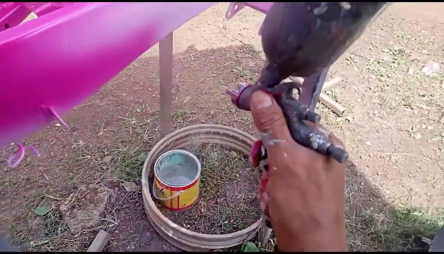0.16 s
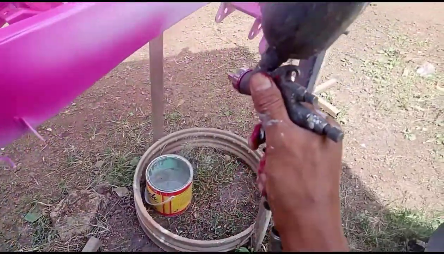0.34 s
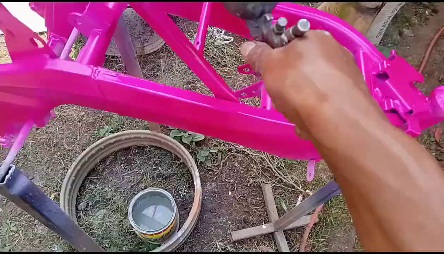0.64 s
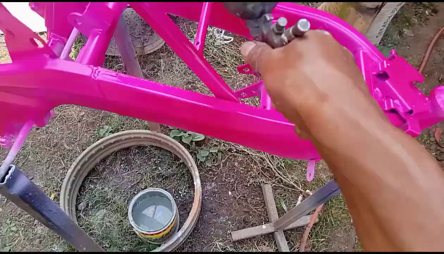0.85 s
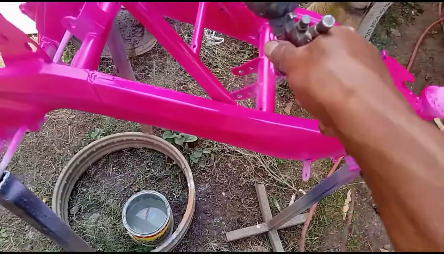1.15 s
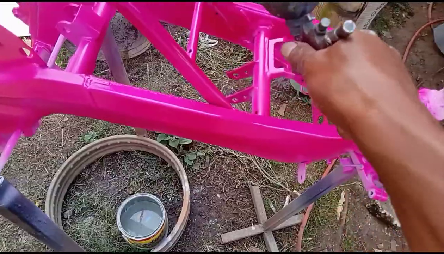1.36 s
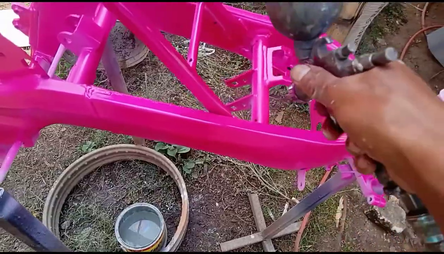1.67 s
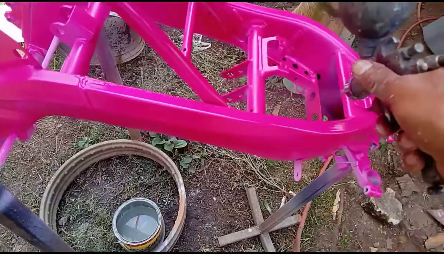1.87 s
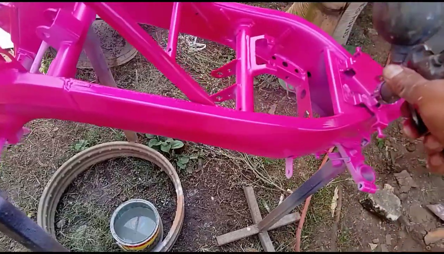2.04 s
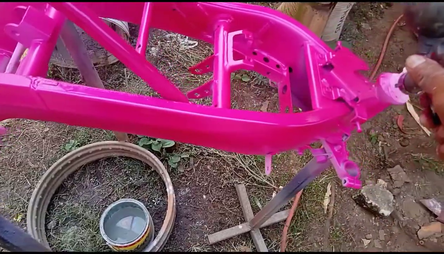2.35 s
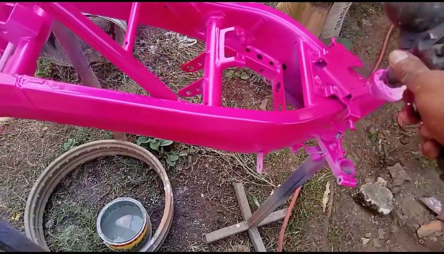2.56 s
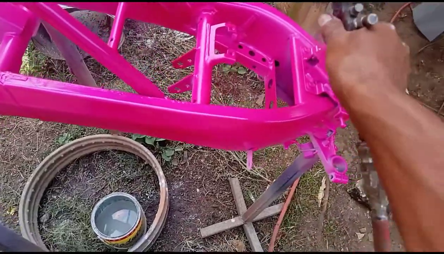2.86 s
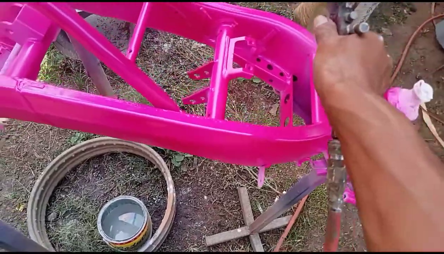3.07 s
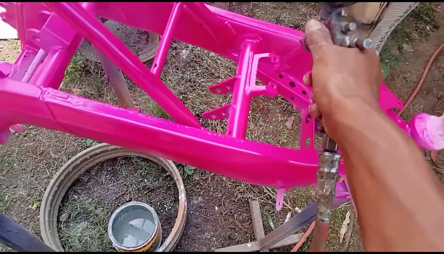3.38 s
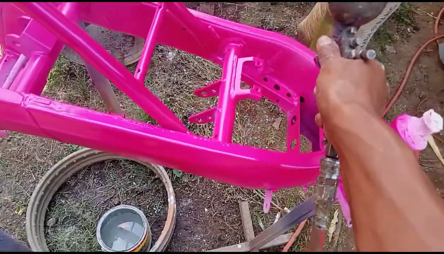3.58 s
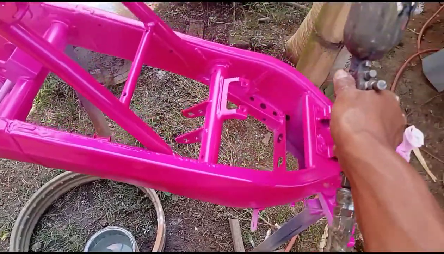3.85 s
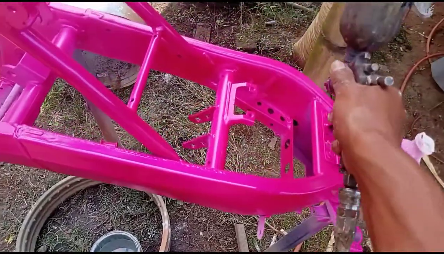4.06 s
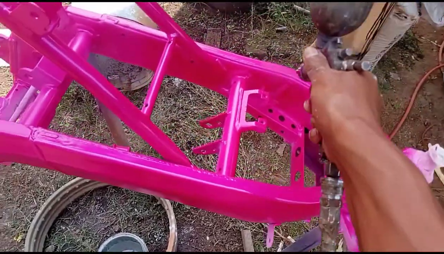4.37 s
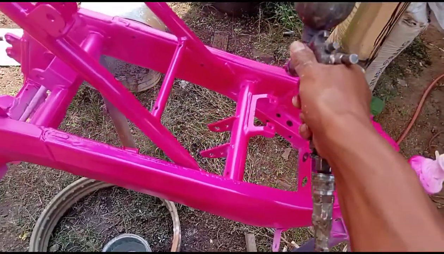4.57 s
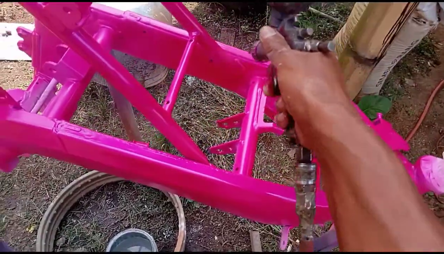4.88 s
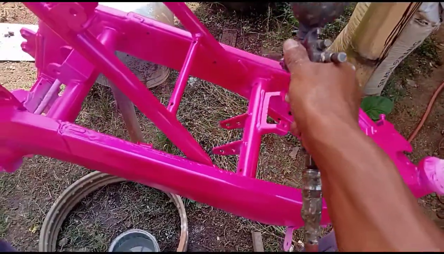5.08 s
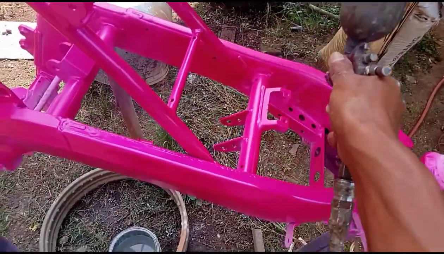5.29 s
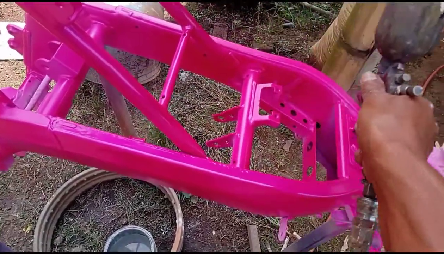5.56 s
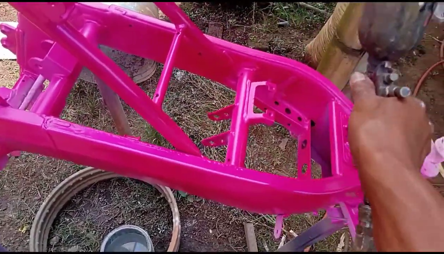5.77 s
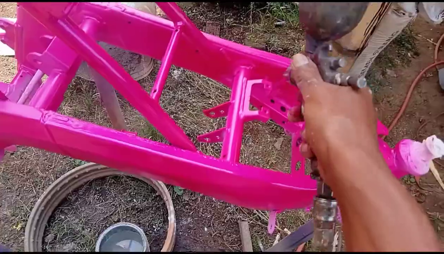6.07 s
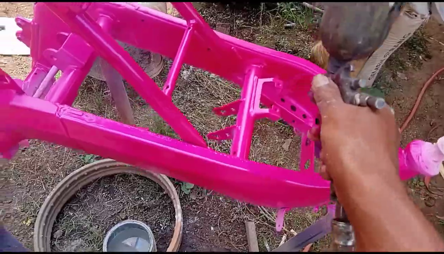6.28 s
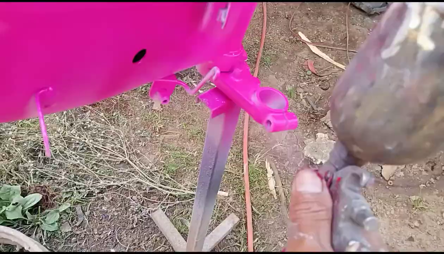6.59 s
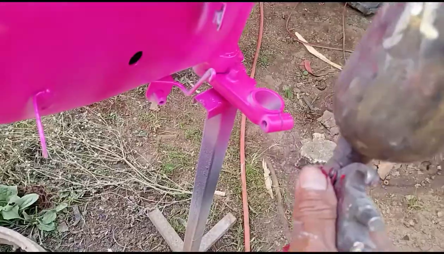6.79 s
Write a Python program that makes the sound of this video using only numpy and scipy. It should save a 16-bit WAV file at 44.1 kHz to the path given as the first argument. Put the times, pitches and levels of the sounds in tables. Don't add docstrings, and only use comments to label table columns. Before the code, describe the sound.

A steady, dry, airy roar of paint spraying onto steel tubes fills the foreground, with fizzing, sizzling swells as the fan strikes metal. Underneath are a fast muffled compressor chug, faint hollow hose blips, low ground rumble and a passing one-cylinder engine. The sound stops sharply twice, early and late, each time swelling back within a fraction of a second. Close, nearly mono microphone in an open yard.

```python
import sys
import numpy as np
from scipy import signal
from scipy.fft import rfft, irfft
from scipy.io import wavfile
from scipy.ndimage import uniform_filter1d

SR = 44100
rng = np.random.default_rng(int(sys.argv[2]) if len(sys.argv) > 2 else 0)


def boost(x):
    u = np.asarray(x, float) / 20
    return 10 ** u


def to_wav(s):
    ch = np.atleast_2d(s).T
    pcm = np.round(np.clip(ch, -1, 1) * 32767)
    wavfile.write(sys.argv[1], SR, pcm.astype(np.int16))


N = 305613
T = np.arange(N) / SR


def evened(x):
    return x / np.sqrt(np.mean(x ** 2) + 1e-20)


def read(points, hz):
    f, value = np.transpose(points)
    return np.interp(np.log(hz + 1e-3), np.log(f), value)


def columns(tables, t):
    s, *cols = np.transpose(np.concatenate(tables))
    return [np.interp(t, s, c) for c in cols]


def part(shape_db, level_db):
    power = boost(shape_db) ** 2
    return power / power.sum(0) * boost(level_db) ** 2


def drift(shape, bins, frames):
    across = uniform_filter1d(rng.standard_normal(shape), bins, 0)
    return evened(uniform_filter1d(across, frames, 1))


def grid(hop, size):
    return np.arange(N // hop + 5) * hop / SR, np.fft.rfftfreq(size, 1 / SR)[:, None]


def noise(power, size):
    z = rng.standard_normal((2, *power.shape[::-1]))
    spectrum = (z[0] + 1j * z[1]).T * np.sqrt(power)
    return np.sqrt(8 / 3) * signal.istft(spectrum, nperseg=size, noverlap=size * 3 // 4)[1][:N]


def ring(t, hz, swell):
    return (t / swell / 2) ** 2 * np.exp(2 - t / swell) * np.sin(2 * np.pi * hz * t)


# start t/s, end t/s
VIEWS = [
    (-1, .6786),
    (.767, 6.2787),
    (6.466, 8),
]


def per_view(rows, t):
    return np.transpose(rows)[..., np.searchsorted([start for start, _ in VIEWS[1:]], t)]


# centre t/s, level/dB, half length t/s
LULLS = [
    (.97, -5, 0.051),
    (4.33, -8, 0.065),
    (4.7, -11, 0.035),
]


def lulls(t):
    return sum(db * np.exp(-((t - s) / half_s) ** 2) for s, db, half_s in LULLS)


# centre t/s, half length t/s, f/Hz, glide f/Hz per s, level/dB
GLINTS = [(.17, .17, 11050, 1800, 4), (.5, .15, 11300, 2000, 2.5), (1.25, .3, 5650, -300, -5),
          (3.5, .1, 12500, 0, 4), (3.97, .05, 10100, 0, 6), (4.2, .25, 9400, 800, -3),
          (4.83, .1, 10100, 500, 5), (4.95, .22, 12800, -1200, 4.5), (3.05, .1, 2400, 0, 4),
          (2.5, .4, 4100, 0, 3), (3.75, .25, 4300, 0, -3), (5.3, .2, 3700, 0, -3),
          (.2, .2, 9500, 1500, -2.5), (.35, .2, 14900, 1000, 2.5), (.3, .4, 880, 0, -4),
          (6.2, .1, 4100, 0, 4), (1.6, .1, 1950, 0, -7), (2.87, .04, 2120, 0, -9),
          (4.3, .07, 2050, -1500, -8), (5.3, .2, 2000, 0, -3), (3.6, 2.8, 2090, 0, -3.5),
          (2.7, .1, 7600, 0, 3)]


def glints(hz, t):
    total_db = 0
    for s, half_s, at_hz, glide, db in GLINTS:
        half_width_hz = 50 + .024 * at_hz
        off_pitch = (hz - at_hz - glide * (t - s)) / half_width_hz
        total_db = total_db + db * np.exp(-((t - s) / half_s) ** 4 - off_pitch ** 2)
    return total_db


# rumble level/dB, spatter level/dB
YARD = [(-43, -39.5), (-43.5, -47), (-37.5, -39)]
# f/Hz, level/dB
RUMBLE = [(25, -40), (55, -23), (90, -19.5), (130, -3), (250, -2), (420, -4.5), (600, -14), (900, -17.5)]
# f/Hz, level/dB
SPATTER = [(300, -5), (600, -11), (850, -7.5), (1150, 1), (1600, -1.5), (2070, 2.5), (2500, 3), (4000, -18)]
RUMBLE_PER_ENGINE = 0.11


def yard():
    t, hz = grid(hop=256, size=1024)
    rumble_db, spatter_db = per_view(YARD, t)
    near_db = columns(ENGINE[:1], t)[1]
    rumble_db = rumble_db + RUMBLE_PER_ENGINE * (near_db - near_db.mean()) * per_view([0, 1, 0], t)
    rumble_db = rumble_db + lulls(t)
    spatter_db = spatter_db + 0.65 * drift((1, len(t)), bins=1, frames=12)[0]
    power = part(read(RUMBLE, hz), rumble_db - 0.5) + part(read(SPATTER, hz), spatter_db + 1.0)
    patches_db = 1.57 * drift(power.shape, bins=5, frames=10)
    return noise(power * boost(patches_db + glints(hz, t)) ** 2, size=1024)


# t/s, firing rate f/Hz, level/dB, bark (how far the tailpipe points this way, about
ENGINE = [
    [(.97, 25.1, -61, -0.18), (1.55, 27.9, -50, 0.69), (1.9, 30.5, -57, -0.79), (2.5, 34.7, -49.5, 0),
     (3.2, 36.98, -54, -0.7), (4.45, 37.24, -52.5, -1.38), (5.3, 36.7, -47, -0.56), (5.8, 34.6, -41.5, 1),
     (6.27, 30.2, -45, 1)],
    [(6.6, 35.1, -42, -0.78), (6.74, 34.25, -39, -0.41), (6.93, 33.3, -40.5, -0.19)],
]
ORDERS_DB = [
    [-15, -12, -1.5, -4.5, 2, -7.5],
    [-7, 7, 0, -6, -2, -30],
]
BARK_DB = [-3.5, 5, 2.5, -4.5, -4, -1.5]
# f/Hz, half width f/Hz, level/dB
EXHAUST = [(74, 20, 5), (136.8, 4.9, 5.5), (223.5, 4.2, 1.5)]


def engine():
    out = np.zeros(N)
    for (start, end), rows, orders_db in zip(VIEWS[1:], ENGINE, ORDERS_DB):
        rate_hz, level_db, bark = columns([rows], T)
        rate_hz = uniform_filter1d(rate_hz, 12000)
        turns = np.cumsum(rate_hz) / SR
        for k, db in enumerate(orders_db):
            order = k + 2
            lift_db = BARK_DB[k] * bark
            if order == 2:
                lift_db = lift_db + 2.3 * lulls(T)
            for hz, half, top in EXHAUST:
                lift_db = lift_db + top * np.exp(-((order * rate_hz - hz) / half) ** 2)
            waver_db = 1.8 * evened(uniform_filter1d(rng.standard_normal(N), 4000))
            tone = np.sqrt(2) * np.cos(2 * np.pi * (order * turns + rng.random()))
            out += boost(level_db + db + lift_db + waver_db) * tone * (T >= start) * (T < end + .05)
    return out


# one delivery knock t/s, stroke rate f/Hz,
# intake f/Hz, intake level/dB, delivery f/Hz, delivery level/dB
PUMP = [(.294, 10.04, 385, -37.5, 295, -33.5), (3.001, 10.036, 388, -41, 306, -32.5),
        (6.633, 10.04, 450, -37, 300, -40)]
INTAKE_LEAD_S = 0.019
# f/Hz, width f/Hz, level/dB, throb 0-1, throb phase in turns
TANK = [
    (121.3, 5.9, -54, 0.2, 0),
    (221.4, 6, -56, 0.3, 0.075),
    (483, 54, -65.5, 0.1, .4),
    (751.4, 36, -52.5, 0.3, 0.78),
    (1139, 66, -53.5, 0.2, 0.85),
]
TANK_HIDDEN_DB, TANK_CLEAR_S = -5, 3


def compressor():
    out, turns, t = np.zeros(N), np.zeros(N), np.arange(4000) / SR
    for (start, end), pump in zip(VIEWS, PUMP):
        s, rate_hz, intake_hz, intake_db, delivery_hz, delivery_db = pump
        inside = (T >= start - .05) & (T < end + .02)
        turns[inside] = ((T - s) * rate_hz)[inside]
        intake = ring(t, intake_hz, .005) + .2 * ring(t, intake_hz * 1.02, .012)
        delivery = ring(t, delivery_hz, .0045) + .2 * ring(t, 341, .011) + .1 * ring(t, 280, .012)
        for knock, db, lead in ((delivery, delivery_db, 0), (intake, intake_db, INTAKE_LEAD_S)):
            strokes = np.diff(np.floor((T - s + lead) * rate_hz), prepend=-N) * inside > 0
            blows = strokes * boost(db + .8 * rng.standard_normal(N))
            out += signal.oaconvolve(blows, knock)[:N]
    screen_db = TANK_HIDDEN_DB * np.clip((TANK_CLEAR_S - T) / .4, 0, 1)
    for hz, width, db, throb, phase in TANK:
        r = np.exp(-np.pi * width / SR)
        sway = signal.lfilter([1], [1, -r], rng.standard_normal((2, N)))
        sway = signal.lfilter([1], [1, -r], sway)
        tone = evened(sway[0] * np.cos(2 * np.pi * hz * T) + sway[1] * np.sin(2 * np.pi * hz * T))
        out += boost(db + screen_db) * tone * (1 + throb * np.cos(2 * np.pi * (turns - phase)))
    return out


# t/s, peak level/dB, f/Hz, rise and fall t/s
BLIPS = [(.07, -43.5, 693, 0.04), (.62, -45.5, 707, 0.043), (3.5, -49, 510, 0.038),
         (1.27, -45.5, 498, 0.029), (1.6, -45, 515, 0.059), (1.855, -34.5, 524, 0.011),
         (4.78, -47.5, 517, 0.17), (4.92, -44.5, 507, .03), (5.3, -42, 514, 0.039),
         (6.215, -39.5, 508, 0.022)]
# t/s, level/dB, f/Hz
TICKS = [
    (2.983, -26, 1900),
    (3.1695, -21, 1900),
]


def hose():
    slow = uniform_filter1d(uniform_filter1d(rng.standard_normal(N), 400), 400)
    flutter = 1 + .55 * evened(slow)
    out = np.zeros(N)
    for s, db, hz, spread in BLIPS:
        out += flutter * boost(db) * np.exp(-.5 * ((T - s) / spread) ** 2) * np.sin(2 * np.pi * hz * T)
    for s, db, hz in TICKS:
        out += boost(db) * np.exp(-.5 * ((T - s) / .0003) ** 2) * np.cos(2 * np.pi * hz * (T - s))
    return out


# t/s, delay t/ms
ECHO = [(0, .745), (.35, .705), (.38, .73), (.68, .69), (.9, .8), (1.5, .81), (2.2, .75), (3.0, .76),
        (3.5, .72), (4.0, .69), (4.3, .7), (4.85, .79), (5.3, .77), (6.3, .75), (6.5, .7), (6.93, .7)]
ECHO_SHARE = [.29, .16, .2]
# delay t/ms, wander as a share, strength 0-1
STRAY = [(1.05, .04, .14), (1.5, .03, .14), (2.2, .03, .14), (3.4, .02, .12)]


def echoes(hz, t):
    paths = [(columns([ECHO], t)[0], per_view(ECHO_SHARE, t))]
    for ms, wander, share in STRAY:
        paths.append((ms * (1 + wander * drift((1, len(t)), bins=1, frames=200)[0]), share))
    bounce = np.clip(hz / 9500, 0, 1) ** 1.5
    return abs(1 + bounce * sum(g * np.exp(2j * np.pi * hz * ms / 1000) for ms, g in paths)) ** 2


# t/s, level/dB, dies away in t/s
STRIKES = [(1.0, 7, 0.34), (1.38, 2.5, 0.14), (1.68, 5, 0.094), (2.58, 6, 0.42), (2.86, -0.5, .15),
           (3.4, 1.5, .15), (3.93, 1, .25), (4.49, 3, .15), (5.0, 5.5, 0.26), (5.3, -0.5, .3),
           (5.64, 0, .3), (6.08, 2.5, 0.13), (6.8, 4.5, .08)]
STRIKE_RISE_S = 0.043


def splashes(t):
    total_db = 0
    for s, db, dies in STRIKES:
        rise = np.clip((t - s) / STRIKE_RISE_S + 1, 0, 1)
        total_db = total_db + db * rise * np.exp(-np.maximum(t - s, 0) / dies)
    return total_db


# t/s, level/dB, facing level/dB (share of the nozzle band as the gun
# turns toward the microphone), roar pitch f/Hz
JET = [
    [(0, -22.5, -1, 3200), (.67, -23.5, -1.5, 3240)],
    [(1.0, -29, -6, 3200), (1.68, -26, -5, 3220), (1.95, -25.5, -3, 3120), (2.76, -27.5, -2, 3220),
     (2.9, -28.5, -3.5, 3050), (3.5, -26.5, -5, 3140), (3.95, -27, -3, 3300), (4.22, -25, -4, 3160),
     (4.5, -28.5, -3.5, 3200), (4.8, -27.5, -5, 3060), (5.25, -28.5, -5, 3170), (5.7, -25.5, -2.5, 3170),
     (6.08, -27.5, -3.5, 3270), (6.27, -25, -6, 3280)],
    [(6.68, -24.5, -3, 3330), (6.85, -22.5, -4, 3300)],
]
# roar, fizz, sizzle, nozzle level/dB
BALANCE_DB = [(-10, -6.5, -1.5, -5.5), (-5.5, -9, -10.5, -4), (-6.5, -9, -7, -2.5)]
# f/Hz, level/dB
ROAR = [(1500, -19.5), (2150, -31.5), (2350, -9.5), (2600, -4), (3100, -4), (3900, -5.5), (4400, -10.5),
        (6000, -20)]
# f/Hz, level/dB
FIZZ = [(2000, -31.5), (4200, -4), (5200, -0.5), (6500, 2), (9000, -6.5), (12000, -34.5)]
# f/Hz, level/dB
SIZZLE = [(6000, -14), (9500, 3.5), (11500, 0), (13500, 0), (14600, 0.5), (15400, 4.5), (16000, -2)]
# f as a factor on its pitch, level/dB
NOZZLE = [(.7, -29.5), (.84, -7), (.93, -1.5), (1.0, 1), (1.08, -2.5), (1.18, -10.5), (1.3, -42)]
NOZZLE_HZ = [8050, 7764, 8100]
FACING_MID_DB, ROAR_PER_FACING, NOZZLE_HZ_PER_FACING = -3, -0.75, -58
FIZZ_SAG_DB_PER_S, SIZZLE_SAG_DB_PER_S = -0.89, -0.26
FIZZ_PER_STRIKE, ROAR_PER_STRIKE, NOZZLE_PER_STRIKE = 0.6, -0.01, 0.23


def jet():
    t, hz = grid(hop=128, size=512)
    level_db, facing, roar_hz = columns(JET, t)
    facing = facing - FACING_MID_DB
    roar_db, fizz_db, sizzle_db, nozzle_db = level_db + per_view(BALANCE_DB, t)
    nozzle_hz = per_view(NOZZLE_HZ, t) + NOZZLE_HZ_PER_FACING * facing
    spent_s = (t - VIEWS[1][0]) * per_view([0, 1, 0], t)
    splash_db = splashes(t)

    roar_db = roar_db + ROAR_PER_FACING * facing + ROAR_PER_STRIKE * splash_db
    fizz_db = fizz_db + FIZZ_SAG_DB_PER_S * spent_s + FIZZ_PER_STRIKE * splash_db
    sizzle_db = sizzle_db + SIZZLE_SAG_DB_PER_S * spent_s + splash_db
    nozzle_db = nozzle_db + facing + NOZZLE_PER_STRIKE * splash_db

    roar_peak_db = 5.3 * np.exp(-((hz - roar_hz) / 500) ** 2)
    power = part(read(ROAR, hz) + roar_peak_db, roar_db)
    power += part(read(FIZZ, hz), fizz_db)
    power += part(read(SIZZLE, hz), sizzle_db)
    power += part(read(NOZZLE, hz / nozzle_hz), nozzle_db)

    comb = echoes(hz, t)
    patches_db = 1.2 * drift(power.shape, bins=5, frames=40)
    flicker_db = 0.34 * drift(power.shape, bins=90, frames=3)
    return noise(power * comb * boost(patches_db + flicker_db + glints(hz, t)) ** 2, size=512)


def scene():
    mono = yard() + engine() + compressor() + hose() + jet()
    return np.array([mono, mono])


# t/s, low f/Hz, high f/Hz
FLECKS = [(.477, 4600, 5750), (.477, 11000, 12450), (1.267, 9650, 11100), (1.36, 8900, 10400),
          (1.522, 12400, 13850), (3.008, 4250, 5250), (3.008, 6200, 7700), (3.008, 8250, 9750),
          (3.612, 8950, 10350), (3.984, 8270, 9750), (3.984, 10350, 12450), (4.703, 10350, 12450),
          (4.75, 6900, 8400), (4.75, 13100, 14450), (4.959, 11700, 13150), (5.33, 5200, 6950),
          (5.33, 9600, 11100), (6.12, 5200, 6350), (6.12, 8950, 10400), (6.12, 11700, 13150),
          (6.12, 13750, 15200)]


def flecks(mono):
    side, window = np.zeros(N), signal.windows.kaiser_bessel_derived(2048, 4 * np.pi)
    hz = np.fft.rfftfreq(len(window), 1 / SR)
    for s, low_hz, high_hz in FLECKS:
        at = round(s * SR) - len(window) // 2
        other = mono[at:at + len(window)][::-1]
        side[at:at + len(window)] += window * irfft(rfft(other) * (hz > low_hz) * (hz < high_hz))
    return boost(-4.0) * side


# t/s after its start, level/dB
FADE = [
    (0, -64),
    (.016, -43),
    (.145, -6),
    (.2, -2),
    (.3, -1.5),
]
CUT_S, CUT_TAIL_DB, CUT_TAIL_S = .0003, -20, .003


def view_changes():
    after, fade_db = np.transpose(FADE)
    gain = np.zeros(N)
    for start, end in VIEWS:
        fade_in = boost(np.interp(T - start, after, fade_db)) * (T >= start)
        drop = np.clip((end - T) / CUT_S, 0, 1)
        smear = boost(CUT_TAIL_DB) * np.exp(np.minimum(end - T, 0) / CUT_TAIL_S)
        gain += fade_in * np.maximum(drop, smear)
    return gain


def low_pass(x):
    return signal.sosfilt(signal.butter(12, 16820, fs=SR, output="sos"), x)


def record(dry):
    bass_cut = signal.butter(2, 62, "high", fs=SR, output="sos")
    thin = signal.sosfilt(bass_cut, dry)
    wide = thin + flecks(thin[0]) * [[1], [-1]]
    band_limit = signal.firwin(801, 15520, window=("kaiser", 9), fs=SR)
    limited = signal.oaconvolve(wide * view_changes(), band_limit[None], "same")
    return low_pass(limited)


dry = scene()
out = record(dry)
to_wav(out)
```